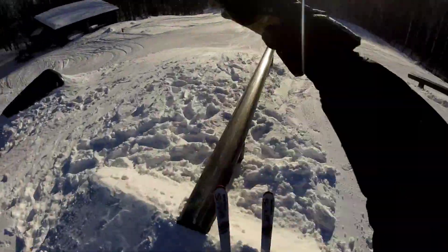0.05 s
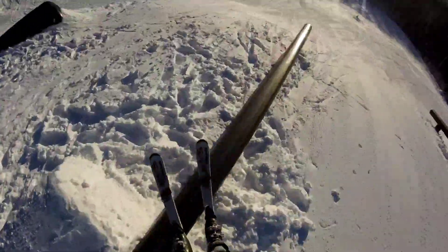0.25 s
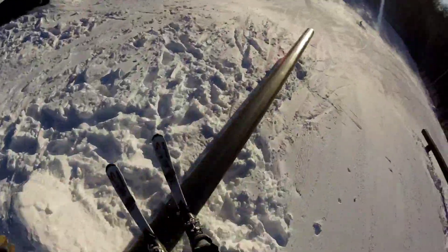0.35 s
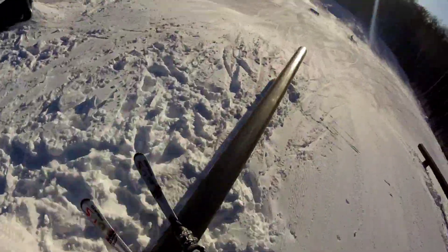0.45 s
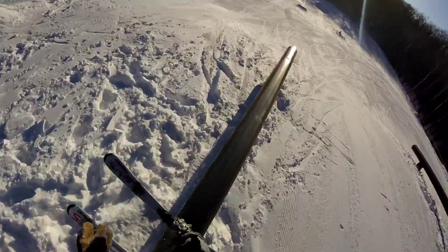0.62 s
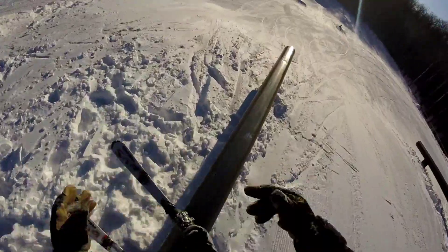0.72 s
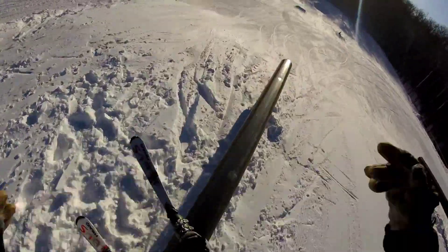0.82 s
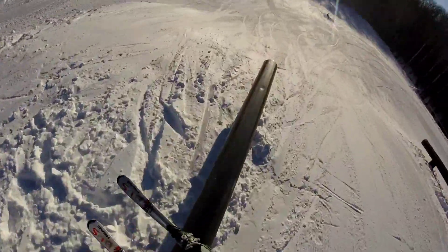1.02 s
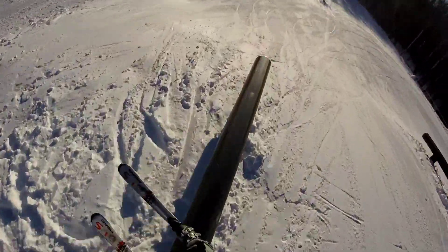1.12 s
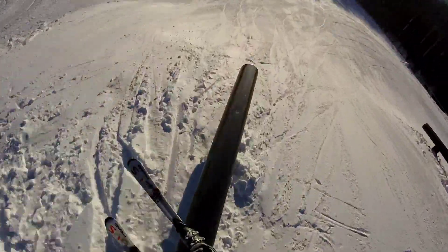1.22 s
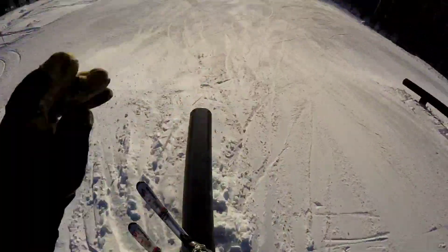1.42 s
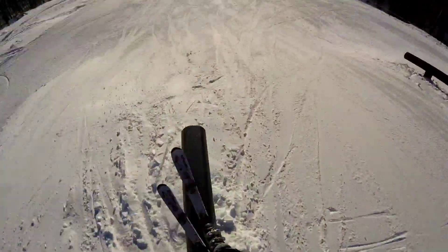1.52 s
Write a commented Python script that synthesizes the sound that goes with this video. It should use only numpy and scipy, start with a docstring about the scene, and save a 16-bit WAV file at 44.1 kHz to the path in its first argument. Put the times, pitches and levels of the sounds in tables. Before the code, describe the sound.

Skis land on a metal rail with one sharp clack, then slide along it with a gritty scrape, smaller clicks and dull thumps. Light wind rumbles on a microphone worn by the skier on a snowy slope.

```python
"""A metal rail in the snow, heard close up from the microphone of a camera worn by the skier.
Light wind rumbles and hisses at the microphone. Underfoot, the ski bases scrape over snow and
steel with a gritty hiss. The skis clack onto the rail and slide along it: each contact rings
a few short modes, and the jolts thump through the camera mount."""
import sys
import numpy as np
from scipy import signal
from scipy.fft import rfft, irfft
from scipy.io import wavfile

SR = 44100
rng = np.random.default_rng(int(sys.argv[2]) if len(sys.argv) > 2 else 0)


def to_wav(sig):
    """Store sig (one row per channel, or 1-D mono) as 16-bit WAV at the path in sys.argv[1].

    Samples outside -1..1 are clipped; the rate is SR.
    """
    pcm = np.clip(np.atleast_2d(sig), -1, 1) * 32767
    pcm = np.round(pcm).astype(np.int16)
    wavfile.write(sys.argv[1], SR, pcm.T)  # frames by channels


N = 68355


def undb(db):
    """Decibels to gain."""
    return 10 ** (np.asarray(db) / 20)


def unit(x):
    """Scale to rms 1."""
    return x / np.sqrt(np.mean(x ** 2))


def curve(rows):
    """Gain over time from (time [s], level [dB]) points."""
    return undb(np.interp(np.arange(N) / SR, *np.array(rows).T))


def colour(x, points):
    """Filter by (frequency [Hz], gain [dB]) points, then scale to rms 1."""
    hz, db = np.array(points).T
    f = np.maximum(np.fft.rfftfreq(N, 1 / SR), 1)
    gain = undb(np.interp(np.log(f), np.log(hz), db))
    return unit(irfft(rfft(x) * gain, N))


def band(centre_hz, width_hz):
    """Noise in one resonance, at rms 1."""
    f = np.fft.rfftfreq(N, 1 / SR)
    detuning = 2 * (f - centre_hz) / width_hz
    return unit(irfft(rfft(rng.standard_normal(N)) / (1 + detuning ** 2), N))


def wander(per_s):
    """A line through random values with spread near 1."""
    return np.interp(np.arange(N) / SR * per_s, np.arange(1000), rng.standard_normal(1000))


def add(out, start_s, x):
    """Mix a short sound in at its time."""
    i = int(start_s * SR)
    out[i:i + len(x)] += x[:N - i]


def swell(t, rise_s, t60_s):
    """A smooth rise and an exponential decay, peak 1."""
    envelope = (1 - np.exp(-t / rise_s)) ** 2 * np.exp(-np.log(1000) * t / t60_s)
    return envelope / envelope.max()


def burst(noise, start_s, t, decay_s, rise_s=0.00032):
    """A stretch of noise that starts with the contact and dies away."""
    envelope = (1 - np.exp(-t / rise_s)) * np.exp(-t / decay_s)
    return envelope * np.roll(noise, -int(start_s * SR))[:len(t)]


# Wind right at the microphone (time [s], level [dB])
WIND_LEVELS = [(0, -46), (.12, -45), (.21, -41.5), (.27, -42), (.4, -48.5), (.62, -48), (.85, -43.5),
               (1, -47.5), (1.1, -46.5), (1.3, -50.5), (1.55, -52.5)]
# Spectrum of its rumble (frequency [Hz], gain [dB])
RUMBLE_SPECTRUM = [(20, 4), (35, 1.5), (60, -9.5), (100, 0.5), (150, -11.5), (220, -16), (320, -19),
                   (600, -28), (1100, -38), (3000, -50), (15000, -100)]
# Spectrum of its hiss (frequency [Hz], gain [dB])
HISS_SPECTRUM = [(100, 2), (300, 1.5), (600, -1), (1000, -7), (1500, -2.5), (3000, -14), (8000, -25),
                 (15000, -51)]


def wind(buffet_db=3, hiss_db=-57.5):
    """Air buffets the microphone over a steady soft hiss."""
    rumble = colour(rng.standard_normal(N), RUMBLE_SPECTRUM) * curve(WIND_LEVELS)
    buffeting = undb(buffet_db * wander(per_s=35))
    hiss = undb(hiss_db) * colour(rng.standard_normal(N), HISS_SPECTRUM)
    return rumble * buffeting + hiss


def friction(grains_per_s=900, spread_db=3, grit_db=-5):
    """Dense tiny slips and coarser grains of ice under the skis."""
    grains = (rng.random(N) < grains_per_s / SR) * rng.choice([-1, 1], N)
    sizes = undb(spread_db * np.minimum(rng.exponential(size=N), 4))
    slips = rng.standard_normal(N)
    return slips + undb(grit_db) * unit(grains * sizes)


# Bases scraping on snow and steel (time [s], relative level [dB])
SCRAPE_LEVELS = [(0, -43.5), (.08, -51), (.26, -48.5), (.33, -48), (.5, -55), (.63, -47.5), (.72, -48.5),
                 (.89, -47.5), (1.1, -48.5), (1.2, -50), (1.33, -52.5), (1.45, -55), (1.55, -59.5)]
# Spectrum of the scrape (frequency [Hz], gain [dB])
SCRAPE_SPECTRUM = [(300, -24), (1000, -39), (1350, -10.5), (1700, -0.5), (2000, -3.5), (2400, -1),
                   (2720, 3.5), (3000, 0.5), (3300, -1), (3600, -9.5), (4000, -13.5), (4500, -25),
                   (6000, -45), (10000, -72), (15000, -84)]
# Fine snow spray (time [s], level [dB])
SPRAY_LEVELS = [(0, -59), (.15, -62), (.3, -56), (.41, -58.5), (.5, -65), (.64, -68), (.78, -61.5),
                (.86, -57.5), (1.01, -60), (1.06, -63.5), (1.43, -67.5), (1.55, -67.5)]
# Spectrum of the spray (frequency [Hz], gain [dB])
SPRAY_SPECTRUM = [(2000, -6), (4200, 1), (5500, -2.5), (6700, 4.5), (7500, -4.5), (8500, -7.5), (9500, -12),
                  (10500, -14.5), (11500, -50), (15000, -59)]
# Edges and bases scuffing (peak time [s], length [s], pitch [Hz], bandwidth [Hz], level [dB])
SKI_SCUFFS = [(0.131, 0.065, 300, 220, -49), (0.296, 0.018, 2850, 1800, -46),
              (0.35, 0.098, 2070, 690, -44.5), (0.403, 0.12, 1920, 600, -51.5),
              (0.526, 0.14, 195, 200, -51.5), (1.081, 0.009, 2600, 910, -46),
              (1.187, 0.0079, 1650, 200, -44.5), (1.199, 0.025, 1130, 406, -56.5),
              (1.266, 0.022, 1900, 258, -51.5), (1.266, 0.012, 3200, 905, -44.5),
              (1.37, 0.26, 979, 40, -69.5)]


def slide(scrape_db=-0.5, flutter_db=0.9):
    """Below the microphone the bases scrape, snow sprays and now and then a ski scuffs harder."""
    t = np.arange(N) / SR
    scrape = colour(friction(), SCRAPE_SPECTRUM) * curve(SCRAPE_LEVELS) * undb(scrape_db)
    spray = colour(friction(), SPRAY_SPECTRUM) * curve(SPRAY_LEVELS)
    scuffs = np.zeros(N)
    for peak_s, length_s, hz, width_hz, level_db in SKI_SCUFFS:
        envelope = np.exp(-.5 * (2 * (t - peak_s) / length_s) ** 2)
        scuffs += undb(level_db) * envelope * band(hz, width_hz)
    flutter = undb(flutter_db * wander(per_s=70))
    return (scrape + spray + scuffs) * flutter


# Skis striking the rail (time [s], level [dB], rise [cycles], emphasis centre [Hz],
# emphasis [dB], treble [dB], rattle [dB re half the ring's peak])
RAIL_CONTACTS = [(0.1219, -30.5, 2.5, 2780, 6.5, 19.5, -4), (0.1916, -28, 3.4, 2520, 8.5, -22, -25),
                 (0.2273, -0.5, 5, 3580, 2.5, -0.5, -36), (0.2468, -33, 3, 2290, 14, -9, -30),
                 (0.2798, -38, 3, 2600, 5, -2, -28), (0.3005, -27.5, 4.8, 1720, 26.5, -8, -4),
                 (0.3656, -32.5, 3, 3000, 8, 7, 1.5), (0.4299, -15.5, 4, 1840, 17, -41, -12.5),
                 (0.4505, -27, 1.6, 2420, 6, -21, -5.5), (0.5223, -38.5, 1.9, 3300, -7, 10, 2),
                 (0.6627, -19, 13, 2490, 18, 17.5, -9.5), (0.667, -25, 2.3, 2830, 12, 14, -30),
                 (0.676, -25, 4.2, 2720, 19, 10, -23), (0.6926, -33.5, 3, 2700, 19, 29, -2.5),
                 (0.7110, -25, 2.8, 2760, 13.5, 20.5, -6), (0.7363, -25.5, 2.2, 2650, 15, 17, -9.5),
                 (0.76, -14.5, 2.5, 2720, 10.5, 24.5, -13), (0.8033, -30, 4.3, 2340, 5, 12, -4),
                 (0.8584, -42, 3.8, 3000, -4, 8, -20), (0.9316, -18, 0.85, 2820, 13, 22.5, -21),
                 (1.0779, -26, 1.6, 2500, 16, -23, -7.5), (1.1837, -32.5, 5.3, 1700, 5, -2, -0.5),
                 (1.2954, -41.5, 3, 4800, 11, 19, -9), (1.3274, -37, 2.7, 2900, 19, -14, -21),
                 (1.3697, -42, 2.7, 3800, -1, 8, -2.5), (1.503, -38.5, 2.4, 2810, 18, -2, -11)]
# Modes that every contact rings (frequency [Hz], relative level [dB], t60 [s])
CONTACT_MODES = [(755, -24, 0.02), (1055, -25.5, .012), (1344, -23.5, 0.019), (1668, -20.5, 0.019),
                 (2198, -5, 0.017), (2698, 0, 0.0092), (2700, -49, 0.086), (3352, 0.5, 0.011),
                 (3867, -2, 0.0086), (4460, -20, 0.016), (4773, -6.5, 0.0071), (5240, -18.5, 0.01),
                 (6450, -16.5, 0.0066), (8080, -21.5, 0.0041), (10420, -31, 0.0037), (13300, -40, 0.0015)]
# Spectrum of the rattle (frequency [Hz], gain [dB])
RATTLE_SPECTRUM = [(200, -12), (1000, -17), (1700, -1), (2700, 0.5), (3700, -4.5), (4500, -17.5),
                   (8500, -23), (11000, -41), (15000, -59)]


def clacks(emphasis_octaves=0.16, treble_hz=5440, radiates_above_hz=920):
    """Ski on rail, close by: short modes, coloured by each contact, ring with a brief rattle."""
    out, t = np.zeros(N), np.arange(SR // 5) / SR
    mode_hz, mode_db, mode_t60 = np.array(CONTACT_MODES).T
    noise = colour(rng.standard_normal(N), RATTLE_SPECTRUM)
    radiation = signal.butter(2, radiates_above_hz, "high", fs=SR, output="sos")
    for start_s, level_db, cycles, centre_hz, emphasis_db, treble_db, rattle_db in RAIL_CONTACTS:
        bump_db = emphasis_db * np.exp(-.5 * (np.log2(mode_hz / centre_hz) / emphasis_octaves) ** 2)
        shelf_db = treble_db / (1 + (treble_hz / mode_hz) ** 6)
        gains = undb(mode_db + bump_db + shelf_db)
        ring = sum(gain * swell(t, cycles / hz, t60) * np.sin(2 * np.pi * hz * t)
                   for hz, gain, t60 in zip(mode_hz, gains, mode_t60))
        ring = signal.sosfilt(radiation, ring)
        rattle = .5 * undb(rattle_db) * burst(noise, start_s, t, decay_s=0.0099)
        add(out, start_s, undb(level_db) * (ring / np.abs(ring).max() + rattle))
    return out


# Jolts reaching the microphone through the mount (time [s], level [dB], pitch [Hz], t60 [s], rise [s])
MOUNT_JOLTS = [(0.2277, -33.5, 274, 0.015, 0.00056), (0.3024, -15, 86.6, 0.13, 0.00047),
               (0.3703, -25, 61, 0.074, 0.0024), (0.416, -31, 88.5, 0.037, 0.0014),
               (0.444, -23.5, 45, 0.024, 0.0037), (0.4518, -15, 72, 0.03, 0.013),
               (0.48, -32.5, 72.5, 0.053, 0.0014), (0.523, -29, 57, .11, 0.0071),
               (0.6758, -14.5, 97.9, 0.071, 0.0027), (0.709, -21, 70, 0.044, 0.0056),
               (0.727, -24, 41.5, 0.034, 0.002), (0.7601, -21, 98, 0.14, 0.00083),
               (1.082, -37.5, 101, 0.063, 0.0022)]


def thumps(knock_cutoff_hz=314, knock_db=-17.5):
    """Each jolt rocks the camera mount at its low resonance, with a dull knock."""
    out, t = np.zeros(N), np.arange(SR // 4) / SR
    dull_noise = band(0, 2 * knock_cutoff_hz)
    for start_s, level_db, hz, t60_s, rise_s in MOUNT_JOLTS:
        knock = undb(knock_db) * burst(dull_noise, start_s, t, decay_s=0.0055)
        rocking = swell(t, rise_s, t60_s) * np.cos(2 * np.pi * hz * t)
        add(out, start_s, undb(level_db) * (knock - rocking))
    return out


def scene():
    """The microphone rides with the skier; everything reaches both channels alike."""
    return np.tile(wind() + slide() + clacks() + thumps(), (2, 1))


def record(dry):
    """The camera cuts the bass below 20 Hz and the treble above 15.3 kHz."""
    low_cut = signal.butter(1, 20, "high", fs=SR, output="sos")
    high_cut = signal.ellip(8, .2, 70, 15300, fs=SR, output="sos")
    return signal.sosfilt(high_cut, signal.sosfilt(low_cut, dry))


dry = scene()
out = record(dry)
to_wav(out)
```